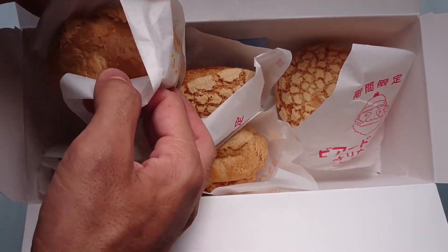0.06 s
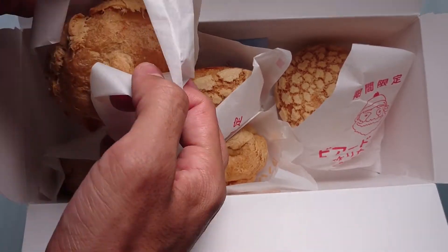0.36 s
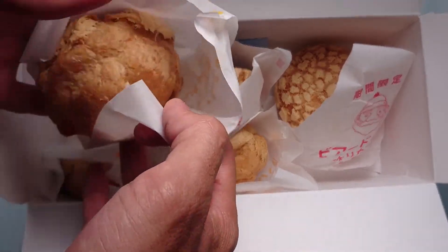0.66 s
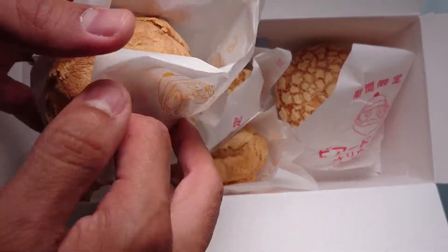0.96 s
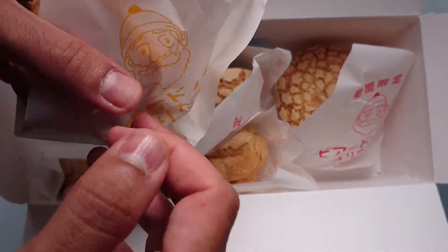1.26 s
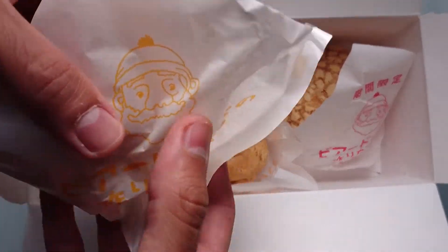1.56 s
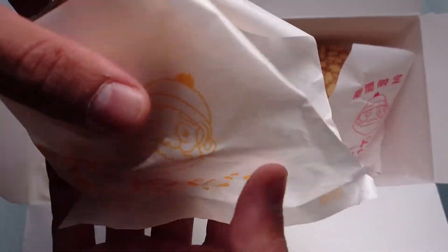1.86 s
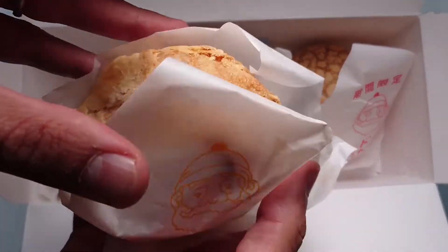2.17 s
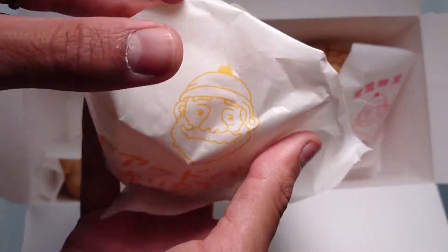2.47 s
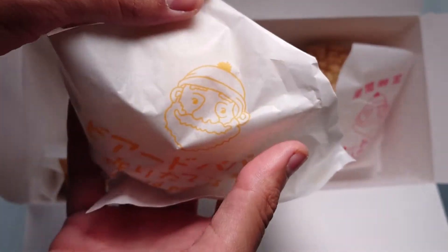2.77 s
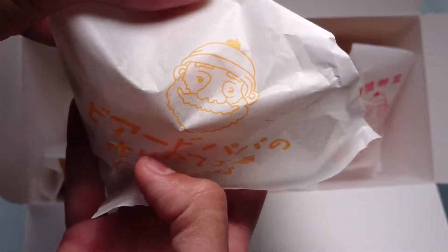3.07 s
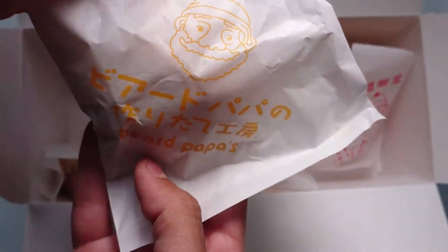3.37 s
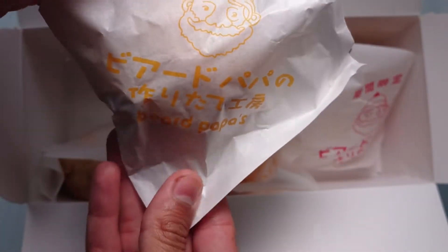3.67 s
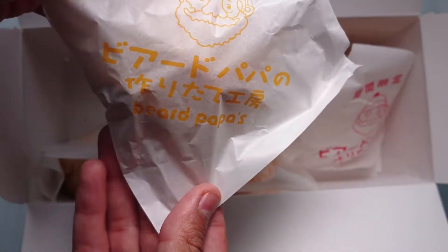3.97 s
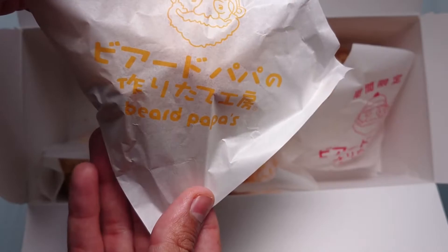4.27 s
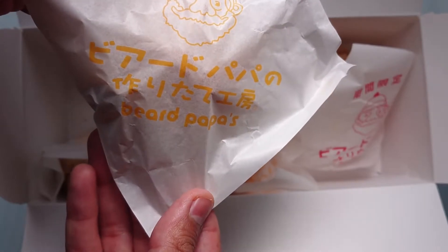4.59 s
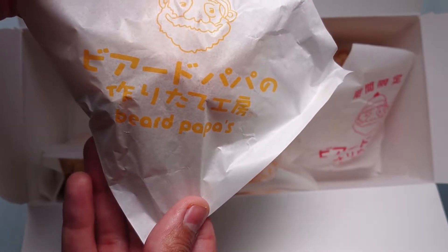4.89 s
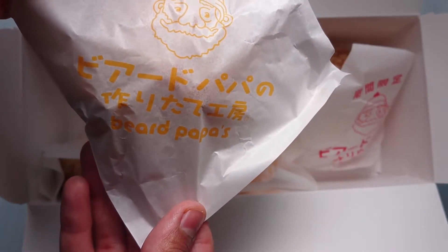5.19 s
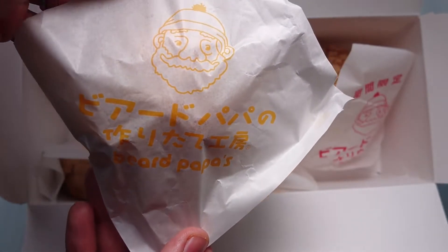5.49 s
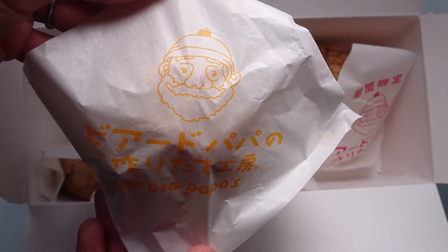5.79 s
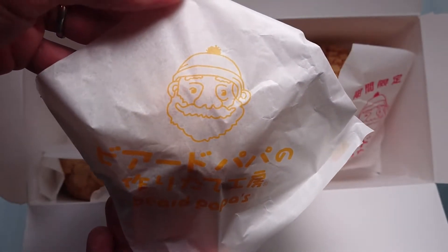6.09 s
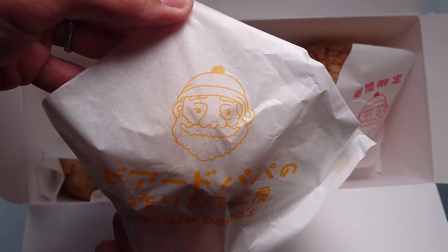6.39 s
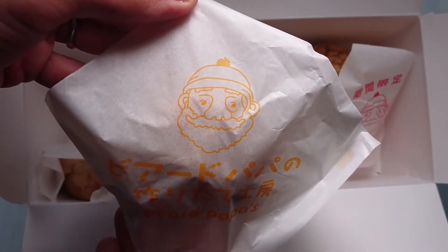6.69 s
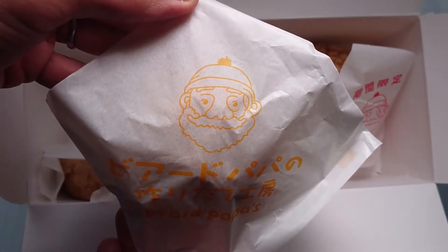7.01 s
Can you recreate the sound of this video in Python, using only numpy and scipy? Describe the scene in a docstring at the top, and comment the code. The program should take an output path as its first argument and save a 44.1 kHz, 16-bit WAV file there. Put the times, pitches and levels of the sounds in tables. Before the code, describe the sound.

Close, crisp crackling and rustling of a paper pastry bag being handled, thinning out over quiet room rumble and a distant engine.

```python
"""Thin paper snaps and crackles close by in a small room: hands lift a bagged pastry out of a cardboard
box and turn it. Creases buckle one by one over the tiny slips of sliding paper, ringing the air in the
box, then in the bag; fingers and pastry bump softly. Behind it a low hum, like an engine outside,
slowly rises in pitch and fades, over room rumble, a brief faint whine and microphone hiss."""
import sys
import numpy as np
from scipy import signal
from scipy.fft import rfft, irfft
from scipy.io import wavfile
from scipy.ndimage import uniform_filter1d

SR = 44100
rng = np.random.default_rng(int(sys.argv[2]) if len(sys.argv) > 2 else 0)


def master(y):
    """Save y as 16-bit WAV."""
    cut = np.clip(np.atleast_2d(y).T, -1, 1)
    pcm = np.round(cut * 32767)  # scale
    wavfile.write(sys.argv[1], SR, pcm.astype(np.int16))


N = 319725
TIME_S = np.arange(N) / SR

# background spectra: freq_hz, gain_db
RUMBLE_SPECTRUM = [(20, -38), (30, -29), (42, -1.5), (72, 3), (100, -6), (130, -4), (170, -18),
                   (300, -22.5), (700, -21.5), (1200, -21.5), (1800, -29.5), (4000, -38), (8000, -60)]
HISS_SPECTRUM = [(100, 12.5), (1300, 1.5), (2500, -7), (4600, -5), (5400, 6), (6100, -10.5), (7000, -20.5),
                 (9100, -17), (10300, -10), (13000, -3), (16000, -9.5)]
# distant engine: time_s, rotation_hz, second_order_db, first_order_db
ENGINE_TRACK = [(0.0, 40.66, -47.5, -58), (0.35, 38.78, -49.5, -55.5), (0.58, 39.8, -52, -55.5),
                (0.9, 39.12, -48, -52), (1.35, 39.4, -42.5, -54.5), (1.7, 39.7, -41, -58),
                (2.3, 40.22, -45, -57), (2.9, 41.16, -42.5, -58.5), (3.3, 42.1, -45, -61),
                (3.7, 42.52, -51, -64), (4.28, 42.73, -60.5, -68), (4.45, 44.3, -55.5, -72),
                (4.76, 43.3, -53, -87), (4.98, 44.26, -53.5, -65), (5.2, 45.62, -55.5, -62.5),
                (5.9, 45.1, -64, -70), (6.6, 45.1, -61.5, -68), (7.24, 46.74, -62.5, -62.5)]
# its weak higher orders: order, level_db (re first order)
ENGINE_OVERTONES = [(3, -11), (4, -33)]
# bumps of fingers and pastry: start_s, pitch_hz, peak_db, t60_s
SOFT_BUMPS = [(1.4, 223, -52, 0.038), (1.453, 223, -49, 0.14), (1.475, 163, -51.5, 0.058),
              (1.659, 210, -42.5, 0.028), (1.669, 70.5, -42, 0.43), (3.895, 192, -43.5, 0.053),
              (3.929, 198.7, -55, 0.066), (4.011, 150, -52, 0.041), (4.248, 170, -58, .06),
              (6.699, 309, -55.5, 0.048)]
# spectra of the sheet, small creases and finger rub: freq_hz, gain_db
PAPER_SPECTRUM = [(150, -6.5), (300, -5.5), (700, -1.5), (1100, 1), (1500, -2.5), (2700, 3), (4000, 5.5),
                  (5000, 6.5), (6200, -2.5), (7500, -9.5), (9000, -12.5), (10300, -3), (13000, -4),
                  (16000, -13)]
TICK_SPECTRUM = [(300, -16), (1500, -10), (4800, 4.5), (7500, -7.5), (9000, -11), (11000, -7), (16000, -5)]
RUB_SPECTRUM = [(100, -15), (200, 5), (370, -1), (500, 1), (680, 5), (870, -25.5), (1100, 0), (1400, -5),
                (2500, -19.5)]
# paper on paper: start_s, length_s, level_db
PAPER_SCRAPES = [(0.125, 0.01, -43.5), (0.144, 0.019, -49.5), (0.429, 0.0084, -44.5), (1.452, 0.025, -41),
                 (1.655, 0.018, -48), (1.895, 0.026, -51), (2.313, 0.0096, -38), (3.633, 0.037, -48)]
# bag stirring in the hands until held still: time_s, crackle_db
BAG_STIRRING = [(0.0, -52.5), (0.68, -61.5), (0.95, -58), (1.35, -68), (1.78, -51), (2.28, -60), (2.9, -69),
                (3.46, -55.5), (3.7, -61), (4.05, -70), (4.3, -74), (4.45, -110)]
# fingers sliding the paper: start_s, length_s, crackle_db, rub_db
FINGER_STROKES = [(0.0, 0.18, -52, -56.5), (0.343, 0.14, -54.5, -59.5), (0.541, 0.092, -51, -57),
                  (0.712, 0.056, -50.5, -58.5), (0.804, 0.029, -50.5, -67), (0.863, 0.025, -53.5, -78),
                  (1.248, 0.02, -54.5, -62), (1.405, 0.089, -57, -59), (1.659, 0.08, -51, -56.5),
                  (1.816, 0.11, -50.5, -63), (1.884, 0.081, -53.5, -55), (1.976, 0.15, -52, -63),
                  (2.168, 0.061, -50.5, -63), (2.294, 0.03, -63, -55.5), (2.445, 0.14, -58, -63),
                  (2.657, 0.08, -59, -79), (2.924, 0.03, -60.5, -80), (3.109, 0.12, -53.5, -56),
                  (3.237, 0.082, -48, -54.5), (3.31, 0.12, -52.5, -62), (3.483, 0.096, -51, -57),
                  (3.591, 0.05, -47.5, -57), (3.729, 0.11, -55, -60.5), (3.876, 0.029, -56, -53),
                  (3.989, 0.014, -56, -55), (4.083, 0.033, -56.5, -54), (4.166, 0.033, -57.5, -61.5)]
# large creases, before band trims; body, fizz and ring are re snap, pan is left minus right:
# start_s, snap_db, body_db, fizz_db, facet_hz, ring_db, pan_db
BUCKLING_CREASES = [(0.0624, -44.5, -4, -11, 2140, -8.5, 2), (0.0806, -51, -15, 0.5, 4700, -2, 4),
                    (0.1255, -42.5, -6.5, -5.5, 2670, -13, 6), (0.135, -44, -10, -5, 2090, 1, 4),
                    (0.152, -46, -22, -3, 2120, -7, 2), (0.1775, -49.5, -5, -5, 3660, -5, 3),
                    (0.2093, -47.5, -11, -9, 2630, -15, 3), (0.236, -47.0, -20, -2.5, 4470, -1.5, 5),
                    (0.3223, -46.5, -13, -0.5, 3830, -3, 3.5), (0.3474, -44.0, -17, 1.5, 5500, 2.5, 9),
                    (0.4312, -46, -7.5, -4, 5030, -7, 1), (0.5188, -49.5, -14, -19, 2800, -10, 2),
                    (0.6165, -44.5, -16, -4.5, 5030, -8, 6), (0.7286, -50.5, -8, -10, 4330, -6, 9),
                    (0.759, -48.5, -8, -6, 4780, -5, 6), (0.829, -51.5, -12, 1.5, 5260, -4, 11),
                    (0.874, -52.5, -16, -5, 2120, -14, 2), (0.9168, -54, -15, -4, 5150, -3, -1),
                    (0.945, -50.5, -10, -9, 4500, 0, 3), (0.9845, -56.5, -19, 0, 5010, 3, 2),
                    (1.0174, -51, -13, 0.5, 2050, 0.5, 6), (1.176, -47, -16, -18, 3090, -6.5, 2),
                    (1.1932, -51.5, -11, -6.5, 4500, -3, 3), (1.2648, -49.5, -8.5, -10.5, 4470, -2, 7),
                    (1.3153, -50.5, -11, -10.5, 4300, 2, 10), (1.4016, -58, 4.5, -8, 680, 3, 3),
                    (1.4181, -48.5, -3.5, 4.5, 4900, 6, 5), (1.449, -41, -9.5, -4, 5070, -8, 3),
                    (1.666, -46.5, -2, -11, 1500, -6, 5), (1.8184, -49.0, -11, -8, 4960, 4, 9),
                    (1.9069, -43.5, -11, -12, 5040, -11, 9), (1.9168, -43.5, -10, -7, 3030, -8, 1),
                    (1.9269, -47, -4, 3, 1280, -5, 5), (2.0002, -47.5, -7, -9, 676, -6, 5),
                    (2.1033, -48, -20, -8, 3223, -1, 8), (2.1114, -42.5, -12.5, -14, 4670, -11, 8),
                    (2.1668, -52.0, -11, -2.5, 4550, 0.5, 8), (2.2573, -42.5, -18, -12.5, 4970, -3, 7.5),
                    (2.319, -43, -7, -9, 2610, -5, 3), (2.4788, -46, -8.5, 1, 5070, 4.5, 8.5),
                    (2.518, -49.5, -20, -11, 5150, -7, 5), (2.5938, -50.5, -12, -7.5, 3660, -7, 4),
                    (2.686, -53.5, -6, 1.5, 4950, -8, 4), (2.7865, -52.5, -10, -14, 5000, -8, 5),
                    (2.841, -48, -8.5, -17, 4860, -11, 4), (2.9302, -56.5, -7, -11, 3700, -6, 3),
                    (3.1282, -47, -13, -8.5, 5100, -7, 4), (3.171, -42.5, -7, -7, 4940, -3, 5),
                    (3.23, -48, -8, -2.5, 5090, 2.5, 4), (3.261, -51, 0, -6, 1490, -5, 2),
                    (3.2816, -44, -8, -0.5, 1480, -9, 7), (3.302, -42, -5, -1.5, 5040, -6, 3),
                    (3.3744, -50, -7, -3, 2130, -7, 9), (3.3948, -46.5, -14, -1.5, 4470, 1, -17),
                    (3.401, -39.5, -14, -7.5, 4940, -4, 16), (3.4143, -43, -6, -10, 4400, -4, 3),
                    (3.5094, -44.5, -9, -12, 5150, 0, 3), (3.5908, -51.5, -15, 1, 5200, 2, 5),
                    (3.6547, -48, -1.5, -2.5, 1490, -4, 9), (3.722, -50, -10, -5, 4510, -14, 2),
                    (3.7401, -46.0, -21, -6, 4500, 0, 4), (3.7643, -38.5, -10, -0.5, 5000, -3.5, 7),
                    (3.8145, -46.5, -12, -6, 4015, 1.5, 6), (3.8976, -43.5, -7, -9, 4940, -5, 4),
                    (3.9135, -45.5, -3.5, -7, 4310, -2, 3), (3.9293, -41, -9.5, -8, 5170, -6, 2),
                    (3.9332, -44, -5.5, -9, 5030, -4, 5), (3.9535, -49, -7, -10, 4470, -6, 6),
                    (4.016, -53, -7, -13, 1500, -10, 3), (4.071, -54.5, -3.5, -7.5, 5090, -3, 4),
                    (4.1075, -45, -14, -8.5, 4550, 0.5, 9), (4.1247, -48.5, -8, -7, 5100, -5, 5),
                    (4.1681, -55.5, -12, -17, 4440, -4, 5), (4.183, -57, -8, -9, 4260, -8, 5),
                    (4.2365, -48, -5, -18, 2000, -12, 1.5), (4.2496, -43.5, -5.5, -3.5, 3700, -5, 5),
                    (4.293, -66, 3, -13, 2520, 1, 3), (4.4886, -62, -2, -20, 510, -6, 2),
                    (4.5807, -55.0, -4, -7.5, 3990, -7, 6.5), (4.6274, -66, -11, -13, 2100, -2, 0),
                    (4.8145, -53, -8.5, -16.5, 4466, -3, 5), (4.9114, -55, -14, -14.5, 4360, -5, 6),
                    (5.518, -52.5, -6, -8.5, 4730, -4, 0), (5.561, -51, -6.5, -18, 5060, -10, 5),
                    (5.5887, -52.5, -5.5, -7.5, 3433, -8.5, 3), (5.62, -62, 2, -23, 938, -5, 4),
                    (5.641, -56, -15, -19, 4130, -1.5, 7), (5.8483, -59, 3, -24, 701, 8, 3),
                    (5.9957, -67.5, -4, -16, 1444, -8, 2), (6.034, -56, -15, -15.5, 3100, -9, 5),
                    (6.6986, -36, -13, -10, 4120, -6, 2.5), (6.963, -52.5, -19, -7.5, 3700, 2, 1)]
# limits of the body, low snap, high snap and fizz bands: edge_hz
BAND_EDGES_HZ = [250, 1300, 3000, 7500, 19000]
# air resonances of the open box and the bag: centre_hz, width_hz, gain_db
BOX_AIR_MODES = [(742, 40, 3), (1000, 36, -1.5), (1507, 57, 2), (2125, 33, 1)]
BAG_AIR_MODES = [(666, 36, -7), (1446, 93, 3.5)]


def undb(db):
    """Decibels to gain."""
    return 10 ** (np.asarray(db) / 20)


def unit(x):
    """Scale to rms 1."""
    return x / np.sqrt(np.mean(x ** 2) + 1e-20)


def steady(x, span_s=0.06):
    """Level a texture's slow swells, keep its grain."""
    return x / np.sqrt(uniform_filter1d(np.mean(x ** 2, axis=0), int(span_s * SR)) + 1e-12)


def curves(table):
    """Table columns interpolated linearly in time."""
    times_s, *columns = np.transpose(table)
    return [np.interp(TIME_S, times_s, column) for column in columns]


def walk(rate_hz):
    """Smooth random drift, rms 1."""
    hold = int(SR / rate_hz)
    steps = np.repeat(rng.standard_normal(N // hold + 1), hold)
    return unit(uniform_filter1d(uniform_filter1d(steps, hold), hold)[:N])


def colour(x, spectrum, size=8192):
    """Minimum-phase filter through (freq_hz, gain_db) points."""
    hz, db = np.transpose(spectrum)
    bins_hz = np.fft.rfftfreq(size, 1 / SR)
    log_gain = np.interp(np.log(bins_hz + 1), np.log(hz), db) * np.log(10) / 20
    cepstrum = irfft(log_gain)
    cepstrum[1:size // 2] *= 2
    cepstrum[size // 2 + 1:] = 0
    impulse = irfft(np.exp(rfft(cepstrum)))
    return signal.fftconvolve(x, impulse[None], axes=1)[:, :x.shape[1]]


def paper_bands(order):
    """Four band-pass filters, body to fizz."""
    return [signal.butter(order, edges_hz, "band", fs=SR, output="sos")
            for edges_hz in zip(BAND_EDGES_HZ, BAND_EDGES_HZ[1:])]


def pan(db):
    """Constant-power gains, left minus right in dB."""
    return unit(undb(np.array([[db], [-db]]) / 2))


def mic_ports(pair, split_hz, lag_samples=4):
    """Long waves reach both microphone ports alike, left first; short waves differ."""
    shared = signal.lfilter(*signal.butter(2, split_hz, fs=SR), pair[0])
    own = signal.lfilter(*signal.butter(2, split_hz, "high", fs=SR), pair)
    return np.array([shared - own[0], np.roll(shared - own[1], lag_samples)])


def add(out, start_s, sound):
    """Mix a sound in at start_s."""
    i = max(int(start_s * SR), 0)
    out[:, i:i + sound.shape[1]] += sound[:, :N - i]


def background(rumble_db=-62, early_boost_db=4, hiss_db=-71.5):
    """Room rumble that eases as the engine fades, plus microphone self-noise."""
    rumble = unit(colour(mic_ports(rng.standard_normal((2, N)), split_hz=340), RUMBLE_SPECTRUM))
    hiss = unit(colour(rng.standard_normal((2, N)), HISS_SPECTRUM))
    swell_db = np.interp(TIME_S, [3.8, 5], [early_boost_db, 0]) + .5 * walk(4.6)
    return rumble * undb(rumble_db + swell_db) * pan(3.3) + hiss * undb(hiss_db) * pan(3.08)


def whine(pitch_hz=276, level_db=-75, waver_db=2.5):
    """A faint wavering tone that stops early."""
    gate = np.interp(TIME_S, [1.2, 1.35], [1, 0])
    gain = gate * undb(level_db + waver_db * walk(12.2))
    phase = 2 * np.pi * pitch_hz * TIME_S + 0.74 * walk(6.6)
    return np.sqrt(2) * gain * np.sin(phase) * pan(2)


def engine(waver_db=3):
    """Only low orders pass the walls; they swell and sink as the speed crosses room modes."""
    rotation_hz, second_db, first_db = curves(ENGINE_TRACK)
    angle = 2 * np.pi * np.cumsum(rotation_hz) / SR
    hum = undb(first_db) * np.sin(angle) + undb(second_db + .5 * walk(27)) * np.sin(2 * angle)
    for order, level_db in ENGINE_OVERTONES:
        gain = undb(first_db + level_db + waver_db * walk(7.1))
        hum += gain * np.sin(order * angle + .5 * walk(6.5))
    return np.sqrt(2) * hum * pan(2.33)


def bumps():
    """A soft push rings one low, damped mode of the box or filled bag."""
    out, t = np.zeros((2, N)), np.arange(SR // 3) / SR
    for start_s, pitch_hz, peak_db, t60_s in SOFT_BUMPS:
        mode = np.sin(2 * np.pi * pitch_hz * t) * np.exp(-np.log(1000) * t / t60_s)
        add(out, start_s, undb(peak_db) * mode * pan(3.6))
    return out


def crackle(slips_per_s, spread_db, decay_s):
    """Tiny slips, many weak and few strong, each briefly shaking the sheet."""
    onsets = rng.random(N) < slips_per_s / SR
    slips = onsets * undb(spread_db * np.minimum(rng.exponential(size=N), 4.5))
    energy = signal.lfilter([1], [1, -np.exp(-2 / (decay_s * SR))], slips ** 2)
    return mic_ports(rng.standard_normal((2, N)) * np.sqrt(energy), split_hz=2300)


def scrapes(ramp_s=.004):
    """A fold drags over the sheet in a short, dense run of slips."""
    push = np.zeros(N)
    for start_s, length_s, level_db in PAPER_SCRAPES:
        inside_s = np.minimum(TIME_S - start_s, start_s + length_s - TIME_S)
        push += undb(level_db) * np.clip(inside_s / ramp_s + .5, 0, 1)
    slips = crackle(slips_per_s=2000, spread_db=2.5, decay_s=.001)
    return steady(colour(slips, PAPER_SPECTRUM)) * push * pan(0.75)


def handling(attack_s=0.0077, release_s=0.018, stir_rub_db=-7):
    """Crackle and rub gains: strokes rise, hold and decay over the stirring of the bag."""
    stir = undb(curves(BAG_STIRRING)[0])
    gains = np.array([stir, stir * undb(stir_rub_db)])
    t = np.arange(SR // 2) / SR
    for start_s, length_s, crackle_db, rub_db in FINGER_STROKES:
        envelope = np.clip(t / attack_s, 0, 1) * np.exp(-np.maximum(t - length_s, 0) / release_s)
        stroke = np.zeros((2, N))
        add(stroke, start_s, undb([[crackle_db], [rub_db]]) * envelope)
        gains = np.maximum(gains, stroke)
    return gains


def sliding_paper(crackle_trim_db=-2, rub_trim_db=-3, friction_db=-6, tick_db=-4):
    """Bright slips over friction hiss, ticks of small creases, dull rub of fingers and pastry."""
    crackle_gain, rub_gain = handling()
    slips = unit(crackle(slips_per_s=900, spread_db=4, decay_s=.0011))
    # facets of each size slip independently in their own band
    facets = sum(signal.sosfilt(band, unit(crackle(slips_per_s=700, spread_db=3.8, decay_s=.0018)))
                 for band in paper_bands(order=3))
    friction = unit(mic_ports(rng.standard_normal((2, N)), split_hz=1730))
    sheet = steady(colour(slips + unit(facets) + undb(friction_db) * friction, PAPER_SPECTRUM))
    ticks = unit(colour(crackle(slips_per_s=70, spread_db=2, decay_s=.001), TICK_SPECTRUM))
    rub = steady(colour(crackle(slips_per_s=650, spread_db=7.5, decay_s=.0026), RUB_SPECTRUM))
    firmness = np.sqrt(crackle_gain / crackle_gain.max())  # small creases yield to firm strokes
    bright = sheet * undb(crackle_trim_db) + ticks * undb(tick_db) * firmness
    return (bright * crackle_gain + rub * rub_gain * undb(rub_trim_db)) * pan(1.5)


def at_level(x, db, window_s=.005):
    """Set each channel's level, taken as its energy spread over window_s."""
    return x * undb(db) / np.sqrt(np.sum(x ** 2, axis=1, keepdims=True) / (window_s * SR))


def crack(t, band_db, spike_s=.0003, spike_db=4, tail_s=.0021, slip_gap_s=.003, slip_db=-9):
    """A crease flips: a noise spike, a short tail and three after-slips."""
    since_slip_s = t - np.cumsum(rng.exponential(slip_gap_s, size=3))[:, None]
    after_slips = np.sum((since_slip_s > 0) * np.exp(-abs(since_slip_s) / spike_s), axis=0)
    envelope = undb(spike_db) * np.exp(-t / spike_s) + np.exp(-t / tail_s) + undb(slip_db) * after_slips
    noise = rng.standard_normal((2, len(t))) * envelope
    burst = colour(mic_ports(noise, split_hz=1530), PAPER_SPECTRUM)
    return sum(at_level(signal.sosfilt(band, burst), db)
               for band, db in zip(paper_bands(order=2), band_db))


def creases(band_trim_db=(.5, -2.5, -2, 2), tilt_db_per_octave=3, mid_hz=3300, mid_decay_s=.0012):
    """Each crease cracks and rings the facet beside it; large, low facets are duller and ring longer."""
    out, t = np.zeros((2, N)), np.arange(1024) / SR
    for start_s, snap_db, body_db, fizz_db, facet_hz, ring_db, pan_db in BUCKLING_CREASES:
        tilt_db = tilt_db_per_octave * np.clip(np.log2(facet_hz / mid_hz), -1, 1)
        band_db = np.array([body_db, -tilt_db / 2, tilt_db / 2, fizz_db]) + band_trim_db
        snap = crack(t, band_db)
        port_lag_s = np.array([[0], [rng.uniform(.00005, .0001)]])
        decay_s = mid_decay_s * np.sqrt(mid_hz / facet_hz)
        envelope = (1 - np.exp(-2 * facet_hz * t)) * np.exp(-t / decay_s)
        ring = at_level(np.sin(2 * np.pi * facet_hz * (t - port_lag_s)) * envelope, ring_db)
        total_db = snap_db + 10 * np.log10(np.sum(undb(band_db) ** 2) + undb(ring_db) ** 2)
        add(out, start_s, at_level(snap + ring, total_db) * pan(pan_db))
    return out


def cavities(x):
    """Paper rings the air in the box, then, lifted clear, the air in the bag."""
    def resonate(modes):
        return sum(undb(gain_db) * signal.lfilter(*signal.iirpeak(hz, hz / width_hz, fs=SR), x)
                   for hz, width_hz, gain_db in modes)

    in_box = np.interp(TIME_S, [1.1, 1.5], [1, 0])
    return x + in_box * resonate(BOX_AIR_MODES) + (1 - in_box) * resonate(BAG_AIR_MODES)


def room(x, t60_s=0.15, tail_db=-14, onset_s=0.0015, echo_s=0.023, echo_db=-24):
    """Short diffuse tail plus one near-wall reflection."""
    t = np.arange(SR // 3) / SR
    envelope = np.clip(t / onset_s, 0, 1) * np.exp(-np.log(1000) * t / t60_s)
    tail = rng.standard_normal((2, len(t))) * envelope
    tail = colour(tail, [(200, 16), (4000, 8), (6000, 4.5), (14000, 9)])
    tail *= undb(tail_db) / np.sqrt(np.sum(tail ** 2) / 2)
    tail[:, int(echo_s * SR)] += undb(echo_db)
    return x + signal.fftconvolve(x, tail, axes=1)[:, :N]


def scene(inward_share=0.74):
    """Paper and bumps in the room, over the hum; most of each snap goes into the box or bag."""
    snaps = creases()
    paper = (1 - inward_share) * snaps + cavities(inward_share * snaps + sliding_paper() + scrapes())
    return room(paper + bumps()) + engine() + whine() + background()


def record(dry):
    """Treble is cut above 16.4 kHz."""
    return signal.sosfilt(signal.ellip(10, .2, 70, 16400, fs=SR, output="sos"), dry)


dry = scene()
out = record(dry)
master(out)
```